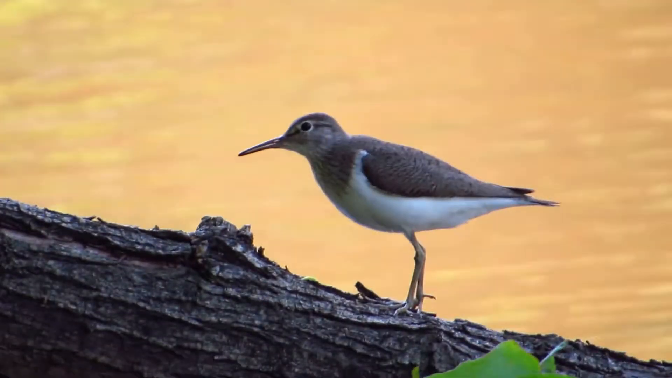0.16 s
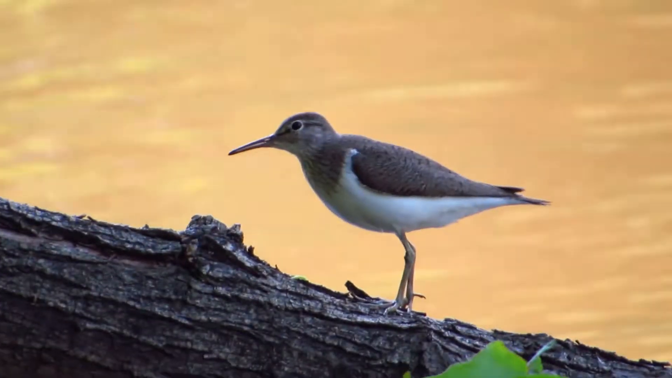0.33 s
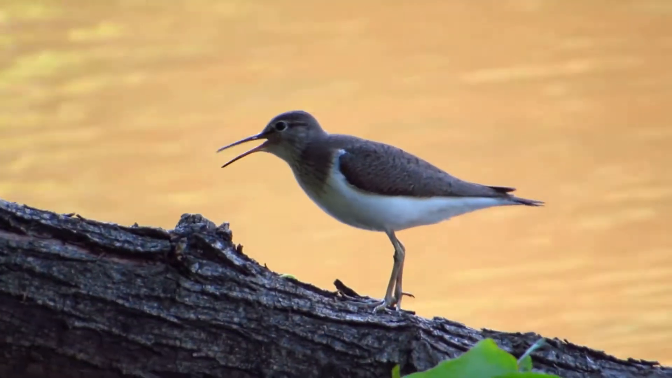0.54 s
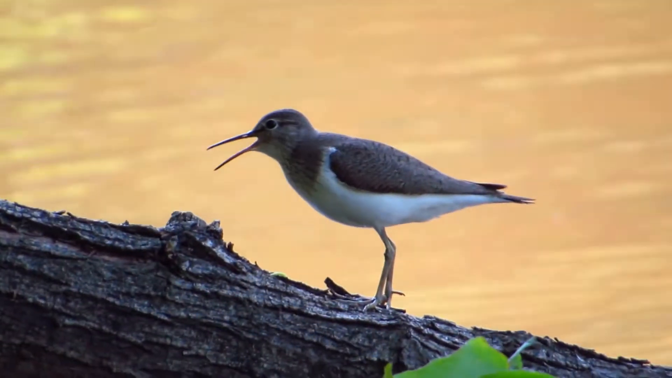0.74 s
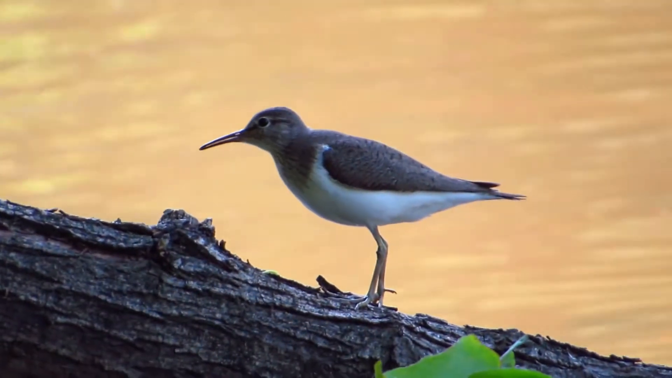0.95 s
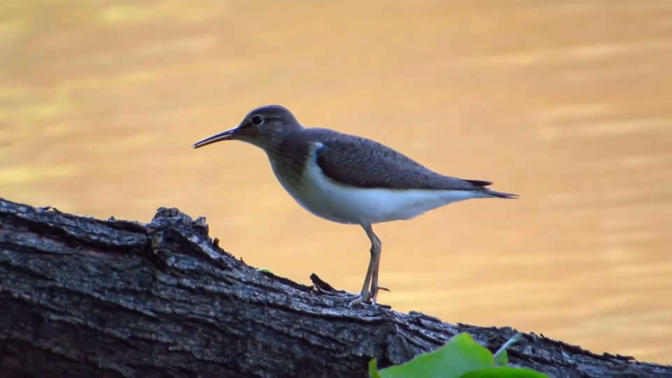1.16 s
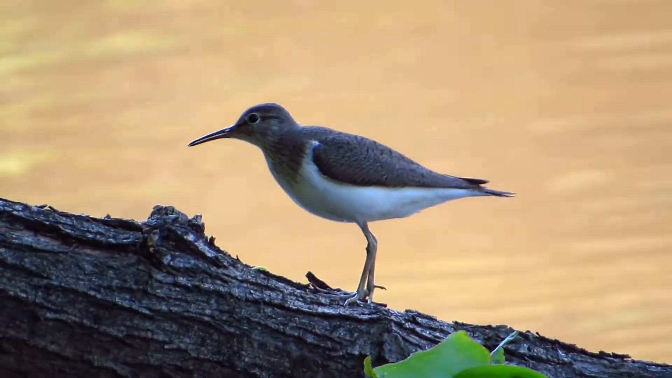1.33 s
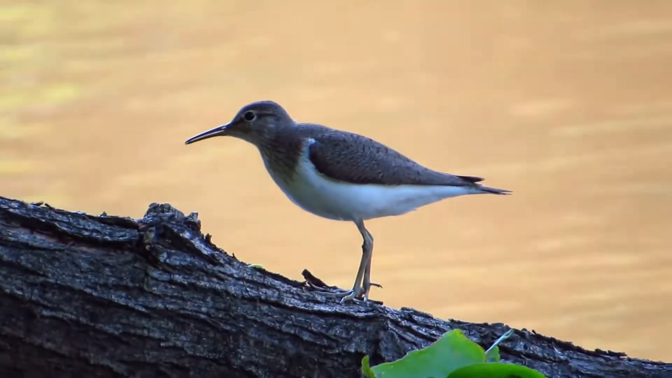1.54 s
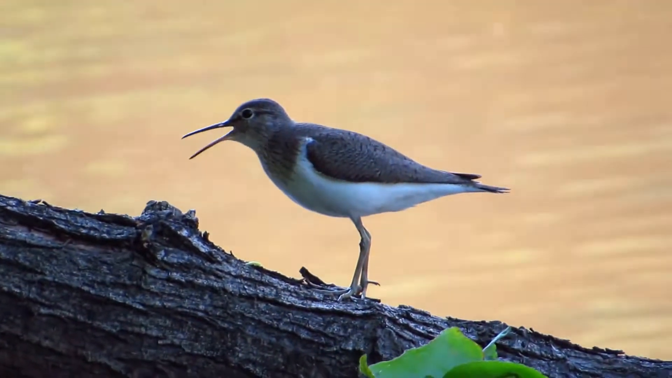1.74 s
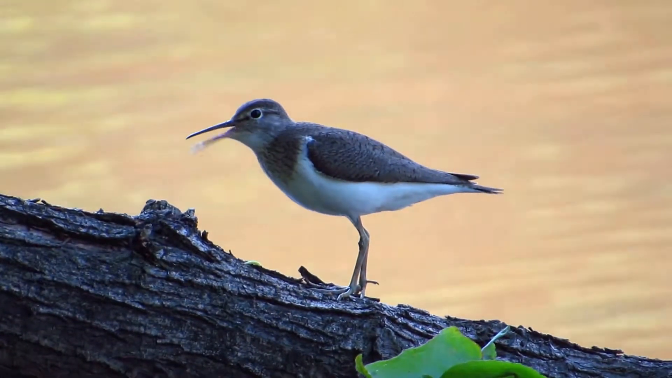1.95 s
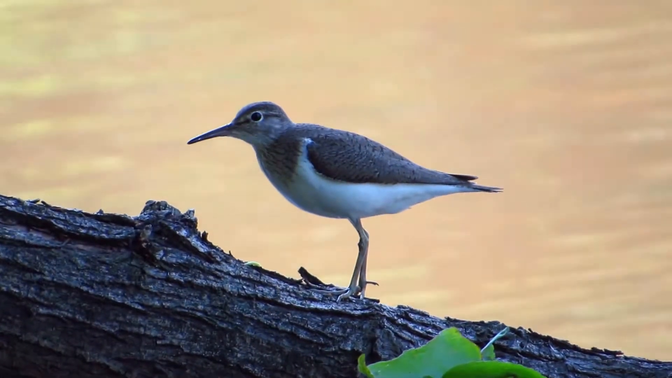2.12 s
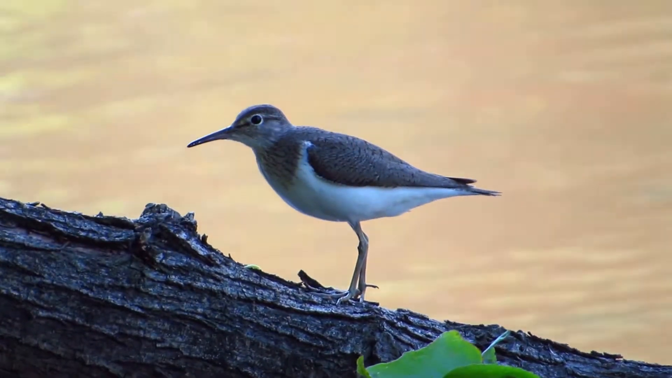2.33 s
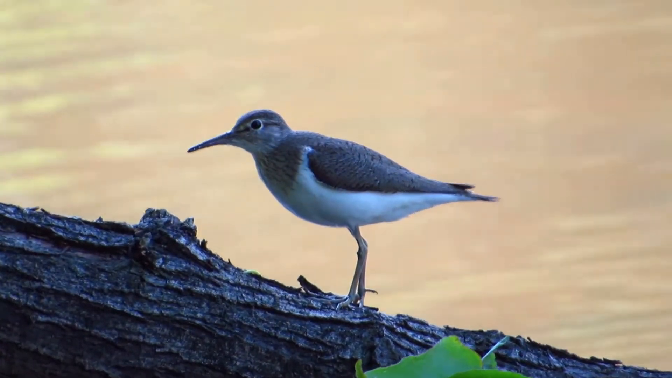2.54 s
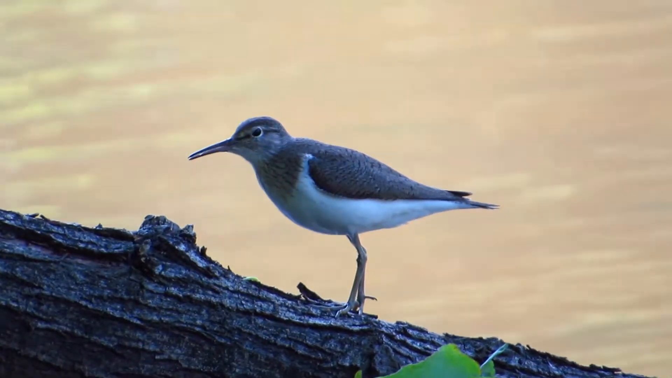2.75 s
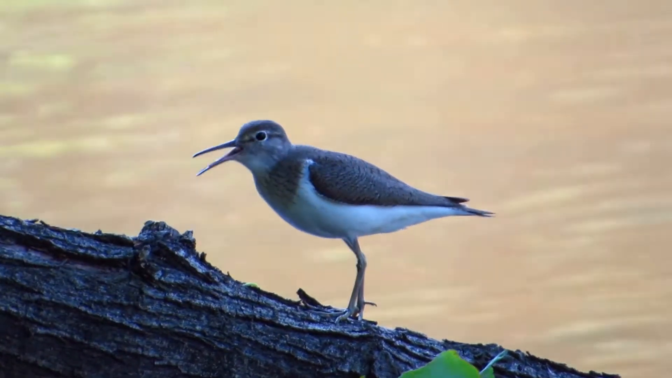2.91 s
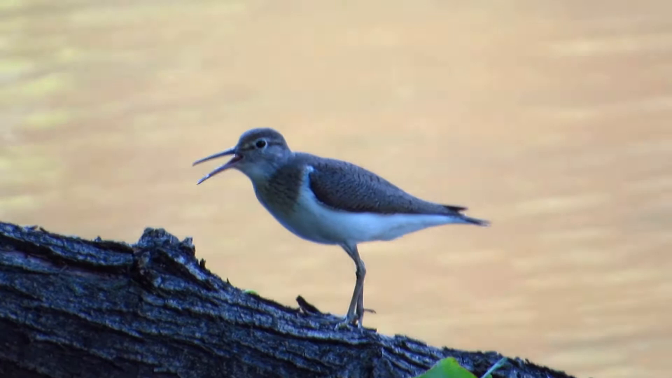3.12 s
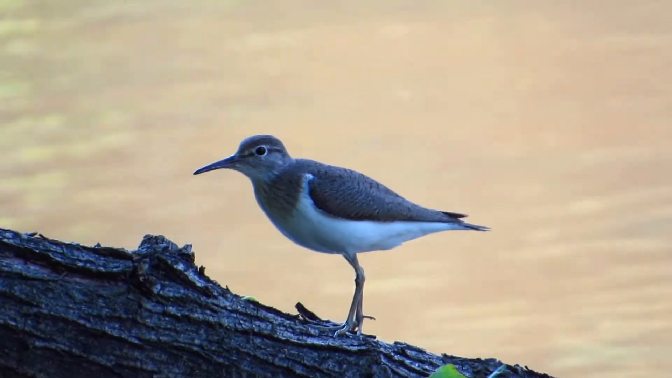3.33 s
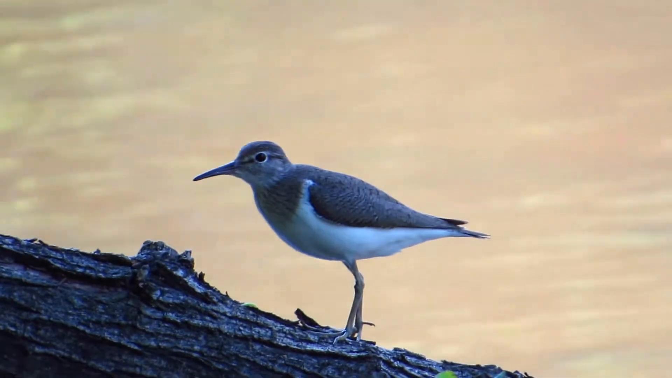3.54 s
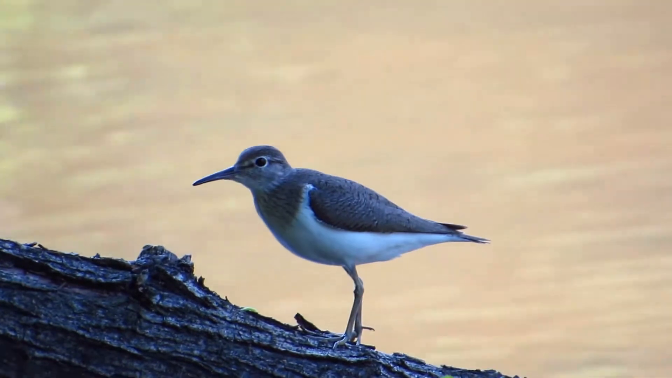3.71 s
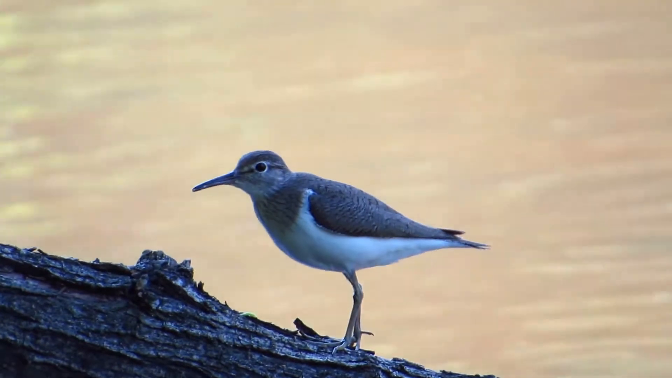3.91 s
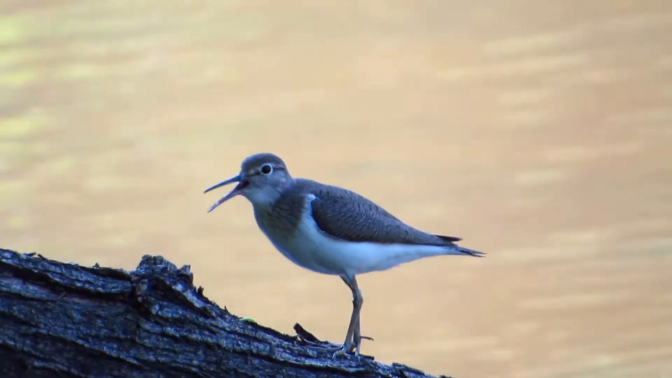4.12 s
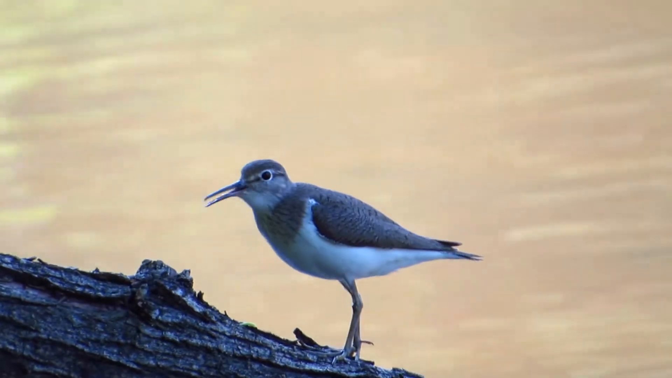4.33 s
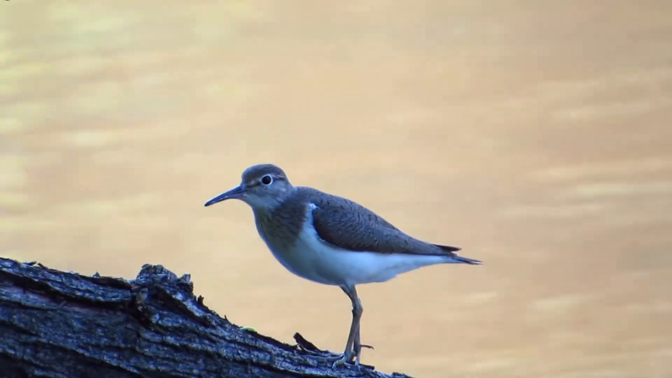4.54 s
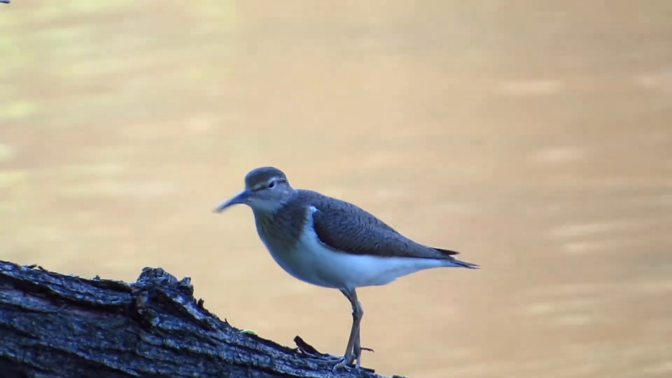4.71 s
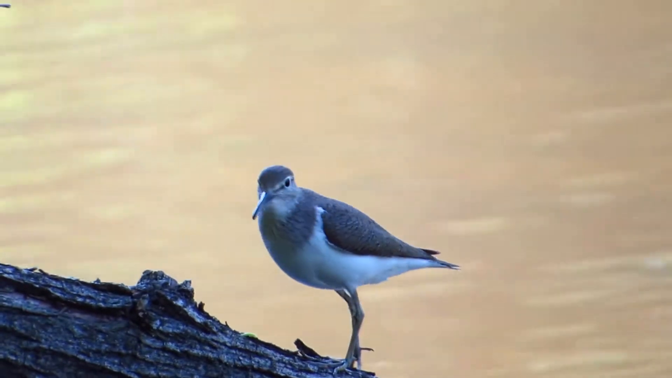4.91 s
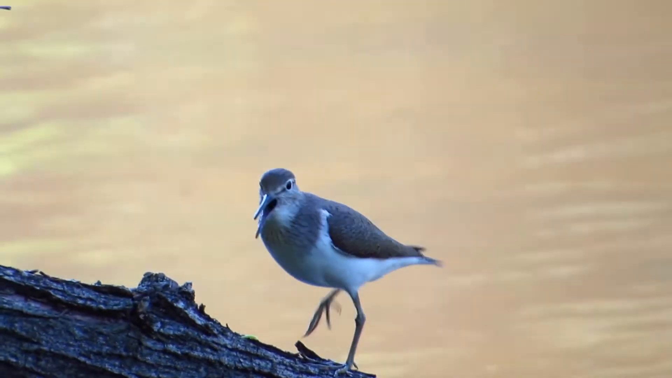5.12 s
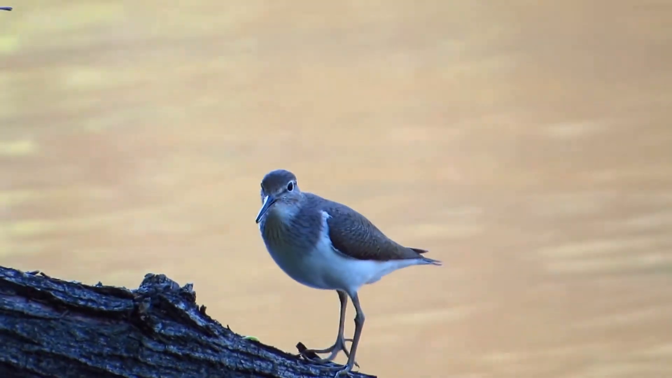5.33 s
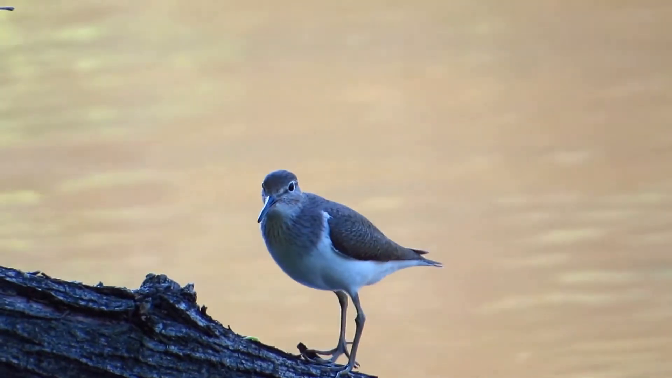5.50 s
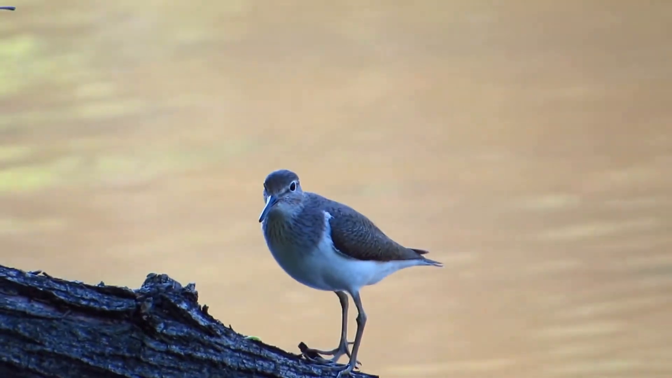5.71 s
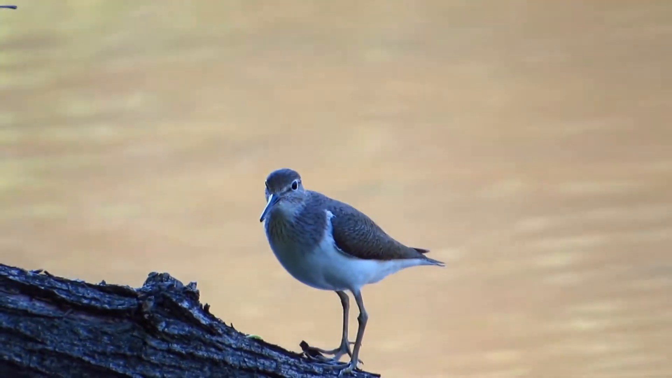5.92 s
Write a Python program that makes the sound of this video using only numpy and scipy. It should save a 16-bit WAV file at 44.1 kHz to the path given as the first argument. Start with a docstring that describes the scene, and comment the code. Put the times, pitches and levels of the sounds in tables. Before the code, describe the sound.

A sandpiper gives five sharp, rising, piercing whistles that echo off a wooded riverbank, over soft water haze and distant twittering birds.

```python
"""Five rising alarm whistles of a sandpiper on a log by a river, thrown back by the wooded bank.
Far off a finch sings a falling song, birds whistle, chip and twitter, and one gives two thin high calls.
At the very start the last echo of an earlier sandpiper whistle dies away.
Birds are gliding sines; random decaying echo taps make log, water, bank and wood.
Below lie a steady river-valley haze of shaped noise and a few plops, which are short decaying sines."""
import sys
import numpy as np
from scipy import signal
from scipy.fft import rfft, irfft
from scipy.io import wavfile
from scipy.ndimage import uniform_filter1d

SR = 44100
rng = np.random.default_rng(int(sys.argv[2]) if len(sys.argv) > 2 else 0)


def int16_out(signal):
    """Quantize to a 16-bit WAV file."""
    q = np.round(np.clip(np.atleast_2d(signal).T, -1, 1) * 32767)
    wavfile.write(sys.argv[1], SR, q.astype(np.int16))


N = 267246

# Sandpiper whistles. Each row: start in seconds, end in seconds, first pitch in Hz, held pitch in Hz,
# glide time constant in seconds, upward creep in Hz per second.
WHISTLES = [(.51, .871, 4230, 4738, .05, 165), (1.645, 1.986, 4230, 4756, .046, 100),
            (2.812, 3.175, 4215, 4668, .043, 325), (4.0, 4.353, 4215, 4755, .057, 20),
            (4.992, 5.307, 4135, 4740, .045, 110)]
# How hard each whistle is blown. Each row: full level in dB, swell time constant in seconds,
# held left-right difference in dB, second harmonic in dB, settled third harmonic in dB.
BLOWING = [(-23.5, 0.089, 2, -25, -31), (-22.5, 0.074, 2.2, -25, -30.5), (-20, 0.1, 3, -26.5, -33.5),
           (-19.7, 0.086, 3.8, -25.5, -34), (-22, 0.066, 0.5, -23, -30.5)]
# Brief level dips. Each row: centre in seconds, half width in seconds, depth in dB.
LEVEL_DIPS = [(.83, 0.017, 2), (2.941, 0.0051, 13), (5.164, 0.013, 8)]
# Levels of the far notes below are rms before the echo and mix gains.
# Finch runs. Each row: start in seconds, note count, spacing in seconds, note length in seconds,
# first pitch in Hz, last pitch in Hz, pitch step in Hz per note, level in dB, level step in dB per note,
# bend (under 1 lingers on the first pitch, over 1 on the last).
FINCH_RUNS = [(1.051, 6, 0.18, 0.078, 5760, 4090, -60.5, -58, 2.7, 1.3),
              (2.111, 2, .12, .075, 3950, 3400, 0, -48, -1.2, 2.3),
              (2.345, 4, .11, 0.09, 4000, 3317, -50.5, -47, -1, 2.1),
              (2.76, 4, 0.087, .075, 3950, 2604, -50.5, -49.5, -0.28, 1.7),
              (3.169, 2, 0.19, 0.074, 4250, 2520, -520, -45, -1, 1.3),
              (3.58, 3, .143, .1, 1650, 3690, -0.5, -47, -1.2, 1.09),
              (4.225, 1, 0.11, 0.085, 3400, 3760, -2.5, -46.5, -0.26, 1),
              (4.29, 1, .1, 0.083, 4010, 1900, 0, -48, 0, 1.3)]
# Clear far whistles, the first row being the last echo of an earlier sandpiper whistle.
# Each row: start in seconds, length in seconds, first pitch in Hz, last pitch in Hz, level in dB.
FAR_NOTES = [(0, 0.046, 4750, 4740, -53.5), (.1, 0.055, 4680, 4490, -68), (.24, 0.15, 1844, 1760, -57.5),
             (.36, 0.079, 2275, 1933, -56), (.92, .14, 3130, 2810, -56), (1.57, 0.043, 2173, 1952, -47),
             (1.77, 0.12, 2039, 1935, -48.5), (1.77, 0.056, 3660, 3300, -50.5),
             (2.46, 0.129, 3390, 3300, -52.5), (5.56, 0.14, 2210, 2040, -58),
             (5.73, 0.067, 2090, 2047, -50), (5.88, 0.12, 4030, 2920, -53)]
# Sharp falling chips. Each row: start in seconds, level in dB.
CHIP_TIMES = [(.43, -62.5), (2.101, -54.5), (2.786, -54), (3.095, -59), (3.45, -58.5), (4.031, -55.5)]
# Thin falling calls. Each row: start in seconds, length in seconds, first pitch in Hz, last pitch in Hz,
# level in dB.
THIN_FALLS = [(1.72, 0.54, 9560, 7890, -59.5), (5.66, .37, 9220, 7990, -57)]
# Twitter deep in the wood. Each row: start in seconds, end in seconds, lowest pitch in Hz,
# highest pitch in Hz, level in dB.
TWITTER_SPANS = [(0.678, 1.051, 1755, 2392, -60.5), (1.303, 2.3, 4090, 5610, -59),
                 (2.332, 2.802, 2880, 3916, -56), (2.794, 3.251, 2391, 3604, -56.5),
                 (4.402, 5.504, 2833, 4115, -58), (5.501, 6, 1807, 4575, -65)]
# Water plops. Each row: start in seconds, pitch in Hz, level in dB before the onset and decay envelope.
WATER_PLOPS = [(2.945, 743, -30), (2.945, 276, -41.5), (3.035, 855, -40), (3.048, 705, -35),
               (3.235, 786, -36)]
# Valley roar spectrum. Each row: frequency in Hz, relative density in dB per Hz.
ROAR_SPECTRUM = [(15, -51), (25, -17), (64, -1.5), (125, -3), (190, -5), (289, -2.5), (363, -3.5),
                 (613, -8), (724, -3), (912, -6), (1060, -10.5), (1640, -15), (2100, -17.5), (2540, -18.5),
                 (3700, -21.5), (4810, -38.5), (8140, -120)]
# Water and leaf hiss spectrum. Each row: frequency in Hz, relative density in dB per Hz.
HISS_SPECTRUM = [(2500, -13.5), (3700, -4.5), (4300, 3.5), (5500, -4), (7500, -6), (9000, -10),
                 (12500, -12), (14000, -21.5), (14800, -32)]
# Slow swell of the haze. Each row: time in seconds, gain in dB.
HAZE_SWELL = [(0, -4.5), (.3, -3), (.7, -0.5), (1.301, 0.5), (2.2, -1), (3.2, -0.2), (4.6, -1), (5.2, -.5),
              (6.06, -0.25)]
# Likeness of the haze at the two ears. Each row: frequency in Hz, left-right correlation (no unit).
EAR_LIKENESS = [(30, 0.81), (80, -0.68), (170, -0.7), (350, -0.47), (700, 0.095), (1400, 0.1), (3000, 0.31),
                (12000, 0.058)]
# Balance of the haze. Each row: frequency in Hz, left-right difference in dB.
EAR_TILT = [(60, -3.5), (110, 2.5), (200, -2.5), (380, 2), (700, -4), (1280, 0), (2370, 1), (4370, 0.5),
            (8060, 0), (14900, 0)]
# Narrow dips in the response. Each row: frequency in Hz, width in Hz.
RESPONSE_DIPS = [(3950, 230), (7900, 170)]

ONSET_DB, ONSET_S, SWELL_DB = 7, 0.011, 22.5  # speaks quickly, then swells as the bill opens
PUSH_DB, PUSH_S = 3, 0.011  # last push before it breaks off
ONSET_PAN_DB, PAN_S = -13.5, 0.04  # start of the glide leans to the right ear
THIRD_EARLY_DB = 7.5  # third harmonic stands out more while the note is soft
CHIP_S, CHIP_FROM_HZ, CHIP_TO_HZ = 0.04, 8300, 5450
BANK_DB = -13.5
ROAR_DB, HISS_DB = -42.5, -53  # before the slow swell
EDGE_HZ = 14900


def amp(db):
    """Decibels to gain."""
    return 10 ** (np.asarray(db) / 20)


def unit(x):
    """Scales to rms 1."""
    return x / np.sqrt(np.mean(x ** 2) + 1e-20)


def read(points, hz):
    """Interpolates a table on a log-frequency axis."""
    f, value = np.transpose(points)
    return np.interp(np.log(hz + 1), np.log(f + 1), value)


def add(mix, start_s, sound):
    """Mixes a sound in at start_s."""
    part = mix[..., max(round(start_s * SR), 0):][..., :sound.shape[-1]]
    part += sound[..., :part.shape[-1]]


def drift(t, hz):
    """Smooth random curve of rms 1 over one second, rolled off above about hz, read at times t."""
    f = np.fft.rfftfreq(4096, 1 / 4096)
    spectrum = rfft(rng.standard_normal(4096)) / (1 + (f / hz) ** 4)
    slow = unit(irfft(spectrum))
    return np.interp(t, np.linspace(0, 1, len(slow)), slow)


def scatter(x, delay_s, t60_s, count):
    """Echoes: random-sign taps of unit energy after delay_s, dying 60 dB in t60_s, different at each ear."""
    t, taps = np.arange(SR) / SR, np.zeros((2, SR))
    at = ((np.arange(count) + rng.random((2, count))) / count * (SR - 1)).astype(int)
    np.put_along_axis(taps, at, rng.choice([-1., 1.], at.shape), 1)
    taps *= (t > delay_s) * amp(-60 * t / t60_s)
    taps /= np.linalg.norm(taps, axis=1, keepdims=True)
    return signal.fftconvolve(np.atleast_2d(x), taps, axes=1)[:, :N]


def sandpiper(beam_db=-5, near_db=-12, wood_db=-17):
    """Five whistles with reflections from log and water, from the bank, and from the wood behind."""
    direct_mix, voice = np.zeros((2, N)), np.zeros(N)
    for row, blowing in zip(WHISTLES, BLOWING):
        direct, all_round = whistle(row, blowing)
        add(direct_mix, row[0], direct)
        add(voice, row[0], all_round)
    # air and leaves take the overtones
    dull = signal.sosfilt(signal.butter(2, 6500, fs=SR, output="sos"), voice)
    overtones = signal.sosfilt(signal.butter(4, 7500, "highpass", fs=SR, output="sos"), voice)
    # the bill aims the overtones away, so more return as echoes
    beamed = scatter(overtones, delay_s=0.002, t60_s=0.34, count=1500)
    # beats against the rising pitch and roughens the onset
    near = scatter(voice, delay_s=0.008, t60_s=0.3, count=1500)
    bank = scatter(dull, delay_s=0.021, t60_s=0.49, count=1500)
    wood = scatter(dull, delay_s=0.056, t60_s=1.17, count=2000)
    echoes = amp(beam_db) * beamed + amp(near_db) * near + amp(BANK_DB) * bank + amp(wood_db) * wood
    return direct_mix + echoes


def whistle(row, blowing, flick_hz=60, flick_s=0.012, drop_hz=420, release_s=0.0083, jitter=0.00059,
            shimmer_db=1.5, click_db=-33, sway_db=2):
    """Near-pure tone glides up, flicks higher and breaks off; returns direct and all-round sound."""
    start_s, end_s, first_hz, held_hz, glide_s, creep_hz_per_s = row
    full_db, swell_s, held_pan_db, second_db, full_third_db = blowing
    t = np.arange(0, end_s - start_s, 1 / SR)
    left_s = t[-1] - t
    shut = np.clip(1 - left_s / release_s, 0, 1)
    db = loudness(t, start_s, full_db, swell_s)
    pan_db = held_pan_db + ONSET_PAN_DB * np.exp(-t / PAN_S) + sway_db * drift(t, 18)
    third_db = full_third_db + THIRD_EARLY_DB * np.exp(-t / swell_s)

    hz = held_hz + (first_hz - held_hz) * np.exp(-t / glide_s) + creep_hz_per_s * t
    hz = hz + flick_hz * np.exp(-left_s / flick_s) - drop_hz * shut ** 2
    phase = 2 * np.pi * np.cumsum(hz * (1 + jitter * drift(t, 150))) / SR

    # level flutters while the pitch still climbs
    flutter_db = 2.8 * np.exp(-(t / 0.13) ** 2) * drift(t, 80)
    gain = np.sqrt(2) * amp(db + flutter_db + shimmer_db * drift(t, 56))
    gain = gain * np.minimum(t / 0.0025, 1) * (1 - shut ** 2)

    # the short waves of the overtones flutter separately at each ear
    ears = []
    for side in (1, -1):  # left, right
        first = amp(side * pan_db / 2) * np.sin(phase + side * 0.27)
        second = amp(second_db - side * 1.7 + 4.1 * drift(t, 29)) * np.sin(2 * phase + side * 0.67)
        third = amp(third_db + side * 1.5 + 3.5 * drift(t, 30)) * np.sin(3 * phase + side * 0.7)
        ears.append(first + second + third)
    puff = amp(click_db) * np.sqrt(shut) * rng.standard_normal(len(t))
    direct = gain * (np.array(ears) + puff)
    # the opening bill aims the sound: the all-round level swells less
    aim = 0.55
    all_round = direct.mean(0) * amp(aim * (np.median(db) - db))
    return direct * (1 - shut ** 2), all_round  # the closing bill cuts the direct sound first


def loudness(t, start_s, full_db, swell_s):
    """Level in dB through one whistle: quick onset, slow swell, last push, brief dips."""
    db = full_db - ONSET_DB * np.exp(-t / ONSET_S) - SWELL_DB * np.exp(-t / swell_s)
    db = db + PUSH_DB * np.exp((t - t[-1]) / PUSH_S)
    for centre_s, width_s, depth_db in LEVEL_DIPS:
        db = db - depth_db * np.exp(-((start_s + t - centre_s) / width_s) ** 2)
    return db


def far_sounds():
    """Birds among the trees and the sandpiper's early echo; finch and twitter arrive only as echoes."""
    song = finch()
    chips = [(start_s, CHIP_S, CHIP_FROM_HZ, CHIP_TO_HZ, db) for start_s, db in CHIP_TIMES]
    notes = slurs(FAR_NOTES, bend=1.4, waver=0.008) + slurs(chips, bend=3, waver=0.026)
    thin = slurs(THIN_FALLS, bend=5.9, waver=0.0015)
    trees = scatter(song + notes, delay_s=0.001, t60_s=0.23, count=4000)
    wood = scatter(song + notes, delay_s=0.03, t60_s=1.0, count=3000)
    deep = scatter(twitter(), delay_s=0.001, t60_s=0.99, count=3000)
    echoes = amp(-3.5) * trees + amp(-3.5) * wood + amp(0.5) * deep
    echoes = echoes + 0.33 * echoes[::-1]  # each ear shares part of the other's echoes
    thin_echoes = scatter(thin, delay_s=0.0016, t60_s=0.53, count=1000)
    return echoes + amp(-4.5) * notes + amp(-2.5) * thin + amp(10.5) * thin_echoes


def finch():
    """Runs of evenly spaced notes, stepping in pitch and level."""
    song = np.zeros(N)
    for start_s, count, spacing_s, length_s, first_hz, last_hz, step_hz, db, step_db, bend in FINCH_RUNS:
        run = []
        for k in range(round(count)):
            shift_hz = k * step_hz
            run.append((start_s + k * spacing_s, length_s, first_hz + shift_hz, last_hz + shift_hz,
                        db + k * step_db))
        song += slurs(run, bend=bend, waver=0.0294)
    return song


def twitter(count=14):
    """Quick random notes of the farthest birds, which run together."""
    notes = []
    for start_s, end_s, low_hz, high_hz, db in TWITTER_SPANS:
        span_hz = high_hz - low_hz
        for k, (when, length, first, last) in enumerate(rng.random((count, 4))):
            note_s = start_s + (end_s - start_s) * (k + when) / count
            length_s = 0.07 + 0.046 * length
            notes.append((note_s, length_s, low_hz + first * span_hz, low_hz + last * span_hz, db))
    return slurs(notes, bend=0.83, waver=0.02)


def slurs(notes, bend, waver):
    """Whistled sines sliding between two pitches; bend over 1 slides fast first, under 1 fast last."""
    out = np.zeros(N)
    for start_s, length_s, first_hz, last_hz, db in notes:
        t = np.arange(0, length_s, 1 / SR)
        hz = last_hz + (first_hz - last_hz) * (1 - t / length_s) ** bend
        hz = hz * (1 + waver * drift(t, 163))
        tone = np.sin(2 * np.pi * np.cumsum(hz) / SR)
        add(out, start_s, amp(db) * unit(signal.windows.tukey(len(t), 0.6) * tone))
    return out


def plops(rise_s=0.004, ring_s=0.015):
    """Small bubbles ring briefly as decaying sines where water laps the bank."""
    out, t = np.zeros(N), np.arange(SR // 5) / SR
    for start_s, hz, db in WATER_PLOPS:
        envelope = (1 - np.exp(-t / rise_s)) * np.exp(-t / ring_s)
        add(out, start_s, amp(db) * envelope * np.sin(2 * np.pi * hz * t))
    return out + amp(0.5) * scatter(out, delay_s=0.0017, t60_s=0.11, count=1000)


def haze():
    """The valley's far roar and a fine hiss of water and leaves share one slow swell."""
    swell = amp(np.interp(np.arange(N) / SR, *np.transpose(HAZE_SWELL)))
    roar = amp(ROAR_DB) * air(ROAR_SPECTRUM, patchy_db=0.86)
    hiss = amp(HISS_DB) * air(HISS_SPECTRUM, patchy_db=3.0)
    return swell * (roar + hiss)


def air(spectrum, patchy_db):
    """Shaped stereo noise of rms 1 with drifting patches; correlation and balance vary with frequency."""
    frames, hz = N // 512 + 5, np.fft.rfftfreq(2048, 1 / SR)
    a, b, c, d, patches = rng.standard_normal((frames, len(hz), 5)).T
    patches = uniform_filter1d(patches, size=16, axis=0)
    patches = unit(uniform_filter1d(patches, size=8, axis=1))
    same = np.clip(read(EAR_LIKENESS, hz), -1, 1)[:, None]  # negative: ears in opposed phase
    tilt = amp(read(EAR_TILT, hz) / 2)[:, None]
    left = a + 1j * b
    right = same * left + np.sqrt(1 - same ** 2) * (c + 1j * d)
    z = np.array([left * tilt, right / tilt])
    z *= amp(read(spectrum, hz)[:, None] + patchy_db * patches)
    return unit(signal.istft(z, nperseg=2048, noverlap=1536)[1][:, :N])


def scene():
    """The near bird over the far sounds and the river."""
    return sandpiper() + far_sounds() + plops() + haze()


def record(dry):
    """Narrow response dips, then a low-pass band limit."""
    for hz, width_hz in RESPONSE_DIPS:
        dry = signal.lfilter(*signal.iirnotch(hz, hz / width_hz, fs=SR), dry)
    low_pass = signal.firwin(511, EDGE_HZ, window=("kaiser", 9), fs=SR)
    return signal.oaconvolve(dry, low_pass[None], "same")


dry = scene()
out = record(dry)
int16_out(out)
```